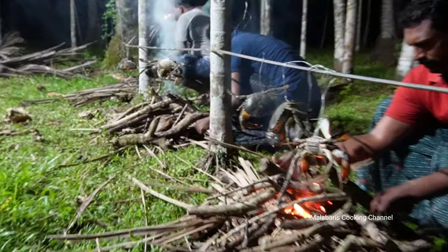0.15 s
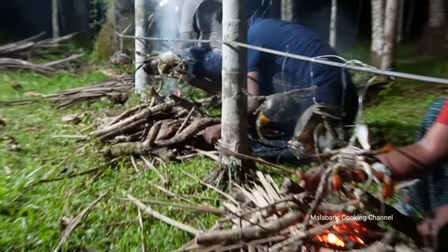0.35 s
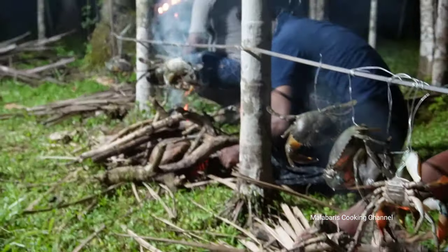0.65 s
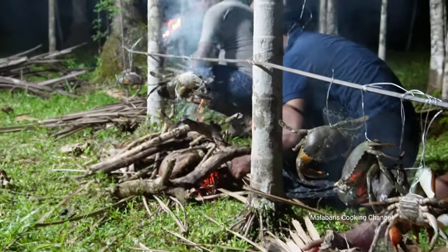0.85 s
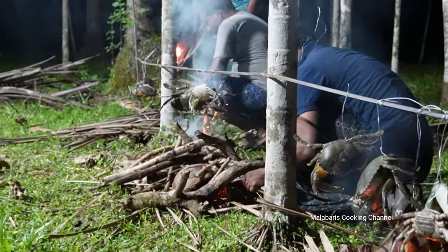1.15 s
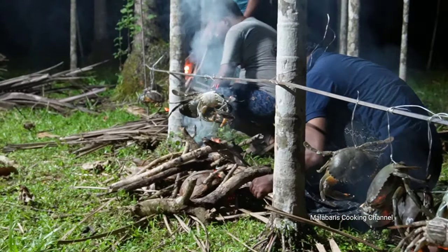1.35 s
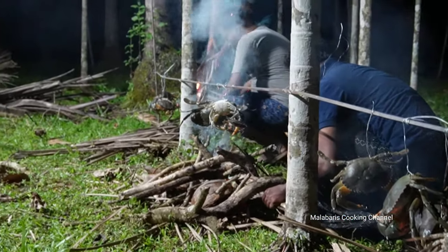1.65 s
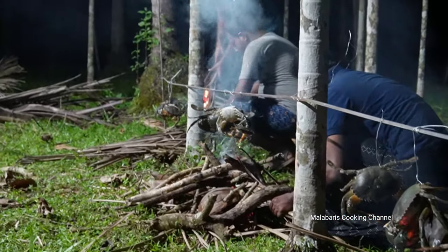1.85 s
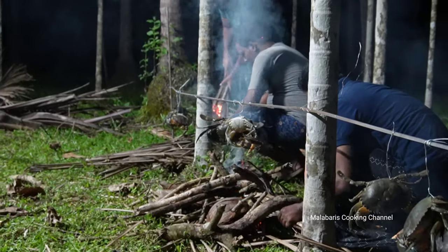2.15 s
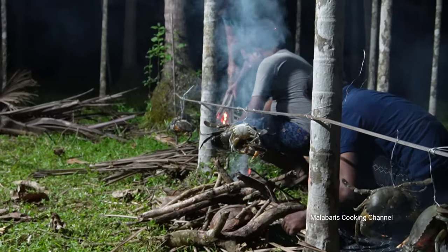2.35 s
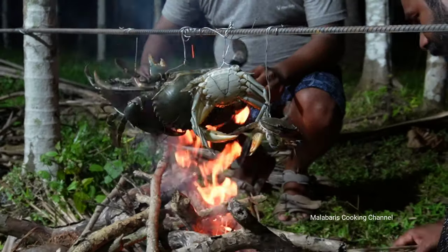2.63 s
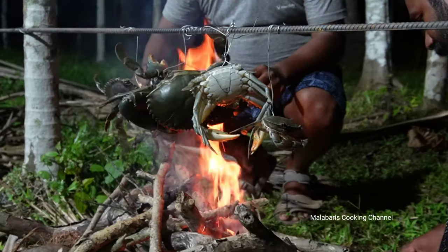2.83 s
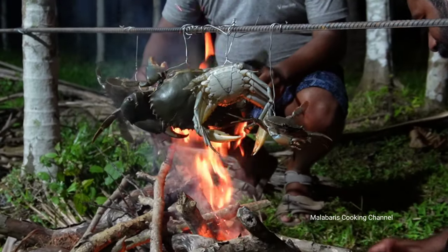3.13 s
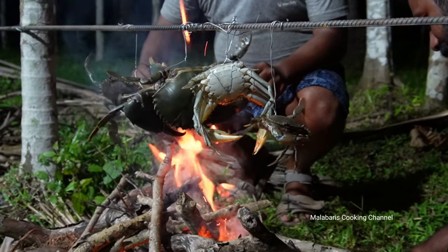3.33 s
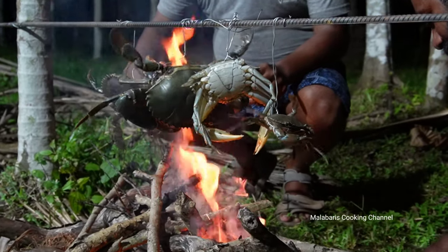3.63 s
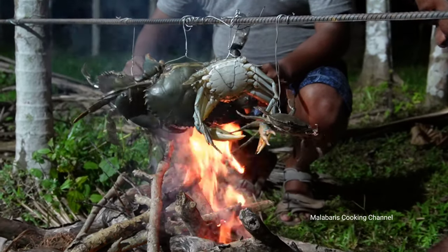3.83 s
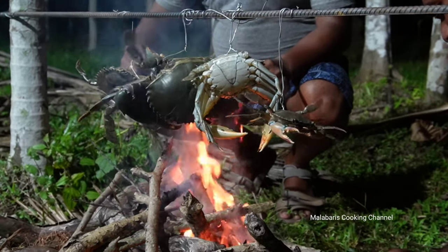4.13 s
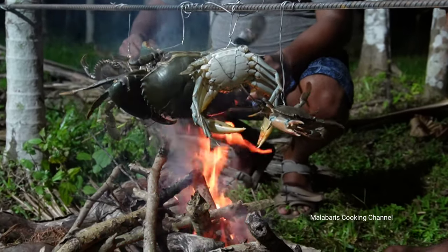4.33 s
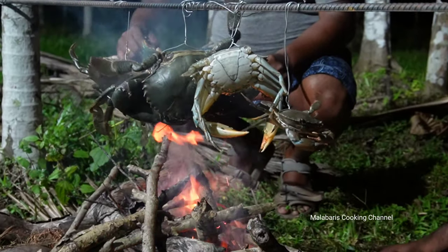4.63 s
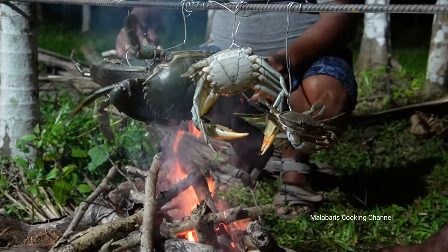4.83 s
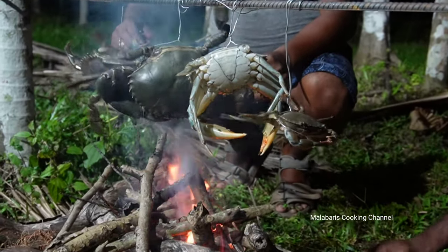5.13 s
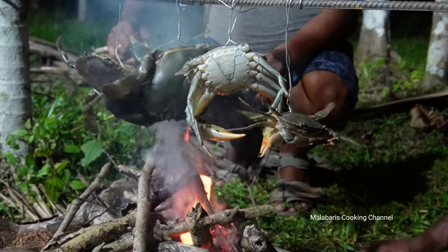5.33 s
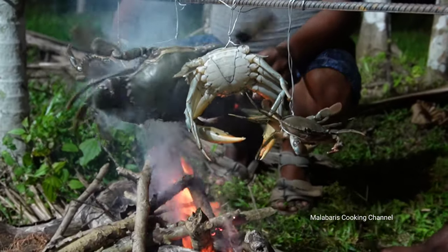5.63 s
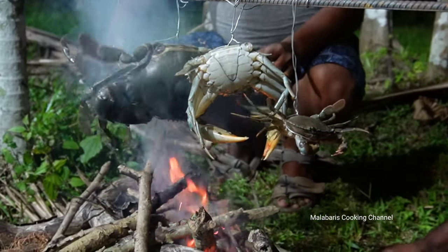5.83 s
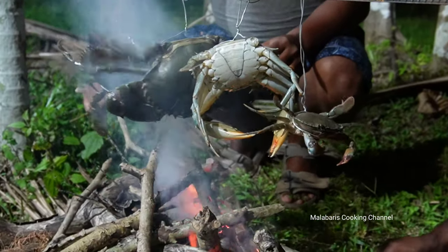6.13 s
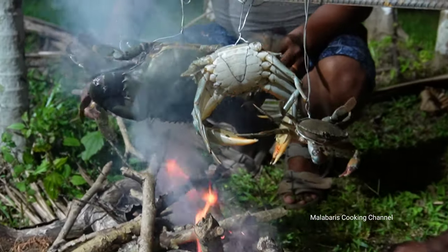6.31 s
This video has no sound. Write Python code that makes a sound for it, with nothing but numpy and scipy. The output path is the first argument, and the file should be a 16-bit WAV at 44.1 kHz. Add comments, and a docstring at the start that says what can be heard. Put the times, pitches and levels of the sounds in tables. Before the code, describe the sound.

Crickets trill in a steady night chorus as dry sticks and palm fronds crackle, snap and crunch in a campfire.

```python
"""A hand-held camera rubs and bumps as it turns, while crickets sing in a grove at night.
Small fires of sticks and palm fronds murmur throughout. Each fracture is an impulse that excites the
wood's resonances: sticks snap and scrape, and dry fronds crackle and crunch as they are fed in.
A near cricket stridulates in long phrases that echo between the trunks, over a steady chorus,
a few low peeps and a thin high buzz."""
import sys
import numpy as np
from scipy import signal
from scipy.io import wavfile

SR = 44100
rng = np.random.default_rng(int(sys.argv[2]) if len(sys.argv) > 2 else 0)


def unload_audio(sound):
    """Save the sound as a 16-bit wav file, at the path given as the first command line argument."""
    columns = np.transpose(np.atleast_2d(sound))
    # keep every value between -1 and 1, then stretch to whole-number steps
    steps = np.round(np.clip(columns, -1, 1) * 32767)
    wavfile.write(sys.argv[1], SR, steps.astype(np.int16))


N = 285327
T = np.arange(N) / SR
MILLISECOND = SR / 1000   # samples
ANTIPHASE = np.array([[1], [-1]])   # left and right gains


def from_db(db):
    """Amplitude ratio: a factor of ten per 20 dB."""
    return 10 ** (np.asarray(db) / 20)


def rms_one(x):
    """Normalisation to unit mean power."""
    return x / np.sqrt(np.mean(x ** 2) + 1e-20)


def in_time(rows):
    """Linear interpolation of a curve at every sample."""
    return np.interp(T, *np.transpose(rows))


def at_hz(points, hz):
    """Interpolation of a spectrum on a logarithmic frequency axis."""
    frequencies, values = np.transpose(points)
    return np.interp(np.log(hz), np.log(frequencies), values)


def band(x, hz, octaves, order=2):
    """A band-pass resonance: the narrower it is, the longer it rings."""
    edges = np.clip([hz * 2 ** (-octaves / 2), hz * 2 ** (octaves / 2)], 10, .48 * SR)
    return signal.sosfilt(signal.butter(order, edges, "band", fs=SR, output="sos"), x + 1e-18)


def white():
    """Gaussian noise has equal mean power per hertz."""
    return rng.standard_normal(N)


def drift(per_s):
    """Random modulation of unit rms, interpolated between so many values a second."""
    knots = rng.standard_normal(2000)
    return rms_one(np.interp(T * per_s, np.arange(len(knots)), knots))


def grains(per_s, size_db):
    """Shot noise: impulses at random moments, most weak, a few strong."""
    sizes = from_db(size_db * np.minimum(rng.exponential(1, N), 5)) * rng.choice([-1, 1], N)
    return sizes * (rng.random(N) < per_s / SR)


def swell_at(s, rise, fall):
    """Exponential growth to 1 at time s, then exponential decay."""
    return np.exp(-np.minimum(np.maximum((s - T) / rise, (T - s) / fall), 20))


def add(out, s, sound):
    """Superposition of a sound from time s onward."""
    i = max(round(s * SR), 0)
    out[..., i:i + sound.shape[-1]] += sound[..., :max(N - i, 0)]


def spread(pair, alike):
    """Sum and difference of two independent signals give left and right the correlation `alike`."""
    alike = np.clip(alike, 0, 1)
    return np.sqrt((1 + alike) / 2) * pair[0] + np.sqrt((1 - alike) / 2) * pair[1] * ANTIPHASE


def pan(db):
    """A level difference places a source; positive is to the left."""
    return from_db([[db / 2], [-db / 2]])


def coloured(draw, spectrum, likeness):
    """Spectral shaping in half-octave bands, each with its own left-right correlation; unit rms."""
    pairs = [[draw(), draw()] for _ in range(2)]
    centres = 20 * 2 ** np.arange(0, 10, .5)
    heard = centres[(centres > spectrum[0][0] / 1.3) & (centres < spectrum[-1][0] * 1.3)]
    out = 0
    for k, hz in enumerate(heard):
        excitation = spread(pairs[k % 2], at_hz(likeness, hz))
        out += from_db(at_hz(spectrum, hz)) * band(excitation, hz, 0.59)
    return rms_one(out)


def grove(x, t60, alike, count=160):
    """Reverberation: convolution with many decaying reflections from trunks and ground."""
    delays, sizes = rng.uniform(.002, .25, (2, count)), rng.standard_normal((2, count))
    echoes = np.zeros((2, SR // 4 + 1))
    for k in range(2):
        echoes[k, (delays[k] * SR).astype(int)] = sizes[k] * from_db(-60 * delays[k] / t60)
    echoes /= np.sqrt(np.sum(echoes ** 2, axis=1, keepdims=True))
    return signal.fftconvolve(np.atleast_2d(x), spread(echoes, alike), axes=1)[:, :N]


def far_insects():
    """Incoherent summation: distant insects blend into a steady hiss."""
    # hiss spectrum: f/Hz, spectrum level/dB
    spectrum = [(4000, -11), (5500, 10), (7500, -10), (9000, -2), (10500, -2), (13000, -11), (15500, -15)]
    return pan(1.8) * from_db(-50.5) * coloured(white, spectrum, likeness=[(6000, .098), (12000, .077)])


def flame_murmur():
    """Unsteady combustion radiates low, gently wavering noise."""
    # flame spectrum: f/Hz, spectrum level/dB
    spectrum = [(20, -34), (35, -13), (60, -2.5), (100, -1), (170, -2), (250, -11.5), (400, -21),
                (800, -21), (1600, -17.5), (3000, -39)]
    waver = from_db(-45 + drift(5.82))
    return waver * coloured(white, spectrum, likeness=[(60, .996), (150, 1.0), (300, 0.76)])


def phrases(last_end_s=6.8):
    """Gating of the near cricket's song: start, end and level of each phrase."""
    # phrases: start t/s, level/dB, pause before the next/s
    song = [(0, -27, 0.081), (.523, -28.5, .105), (1.248, -28.5, .055), (1.891, -26.5, .07),
            (2.501, -27, .065), (3.24, -27, 0.05), (3.85, -26.5, .1), (4.523, -27.5, .095),
            (5.126, -27.5, .09), (5.674, -28, .08), (6.23, -30.5, .08)]
    next_starts = [row[0] for row in song[1:]] + [last_end_s]
    return [(start, following - pause, db) for (start, db, pause), following in zip(song, next_starts)]


def chorus(voices, waver_db):
    """Many crickets of unrelated phase sum to wavering narrow-band noise."""
    out = 0
    for hz, width_hz, db in voices:
        song = band(rng.standard_normal((2, N)), hz, np.log2(1 + width_hz / hz), order=3)
        out += from_db(db + waver_db * drift(12)) * spread(rms_one(song), alike=0.59)
    return out


def choirs(join_s=0.065, fade_s=0.13):
    """Synchrony: neighbours join and fade with the near cricket's phrases; far choirs never pause."""
    # song bands of both groups: f/Hz, bandwidth/Hz, level/dB
    distant = [(2316, 180, -62.5), (3180, 350, -48.5), (6570, 690, -35), (7100, 730, -43.5),
               (8880, 1760, -46)]
    neighbours = [(6263, 590, -36.5), (6710, 54, -37.5)]
    in_step = sum(np.clip(np.minimum((T - start) / join_s, (end - T) / fade_s + 0.18), 0, 1)
                  for start, end, _ in phrases())
    steady = pan(-0.4) * chorus(distant, waver_db=1.54)
    return steady + pan(-0.5) * in_step * chorus(neighbours, waver_db=1.3)


def high_buzz(first_s=.15, every_s=.633, half_length_s=0.11):
    """Sidebands: a bush cricket's fast tooth rate splits its note into lines, blurred by the trees."""
    # spectral lines: f/Hz, level/dB
    sidebands = [(9530, -52), (9880, -41.5), (10240, -49), (10570, -48), (10920, -52), (11270, -60)]
    calls_s = np.arange(first_s, T[-1] + half_length_s, every_s)
    swell = sum(np.exp(-((T - s) / half_length_s) ** 2) for s in calls_s)
    lines = sum(from_db(db) * spread(rms_one(band(rng.standard_normal((2, N)), hz, 0.0066)), alike=0.38)
                for hz, db in sidebands)
    return from_db(-7.5) * swell * lines


def peeps(top_hz=3500, bottom_hz=2980, length_s=0.0427):
    """Linear frequency sweeps: a lower caller slides down in soft peeps that reverberate."""
    # peeps: t/s, level/dB
    calls = [(0.102, -32), (0.345, -34), (1.013, -29), (1.256, -31.5), (5.018, -34), (5.073, -26.5),
             (5.314, -33), (5.367, -26.5), (5.629, -32.5), (5.68, -24)]
    out, progress = np.zeros(N), np.arange(int(length_s * SR)) / (length_s * SR)
    hz = top_hz + (bottom_hz - top_hz) * progress
    peep = np.sin(np.pi * progress) ** 1.3 * np.sin(2 * np.pi * np.cumsum(hz) / SR)
    for s, db in calls:
        add(out, s, from_db(db) * peep)
    return from_db(-2) * out + from_db(-6.5) * grove(out, t60=.6, alike=.5)


def handling(ring_cycles=1.9, body_hz=420, click_db=-11, click_s=0.011, size=4096):
    """Structure-borne sound: bumps ring briefly in the camera's body; the grip rubs and rocks it."""
    # soft impacts: t/s, level/dB, f/Hz
    impacts = [(0.023, -26.5, 358), (.178, -21.5, 218), (0.348, -33, 400), (0.373, -40, 300),
               (.443, -31, 416), (0.495, -28, 407), (0.551, -20, 495), (0.597, -33, 223), (0.62, -17, 454)]
    # friction of the grip: t/s, level/dB
    friction = [(0, -38.5), (.15, -54), (.2, -42.5), (.35, -37.5), (.52, -41.5), (.63, -31), (.7, -77),
                (1.0, -72)]
    # its spectrum: f/Hz, spectrum level/dB
    spectrum = [(80, -37), (130, 3), (205, -5.5), (290, -3.5), (410, -4), (550, -5.5), (1200, -19),
                (2500, -12.5)]
    bumps, t = np.zeros((2, N)), np.arange(size) / SR
    for s, db, hz in impacts:
        thud = np.sin(2 * np.pi * hz * t) * np.exp(-t * hz / ring_cycles)
        noise = rms_one(band(rng.standard_normal((2, size)), hz=920, octaves=3.7))
        click = spread(noise, alike=0.62) * np.exp(-t / click_s)
        add(bumps, s, from_db(db) * (thud + from_db(click_db) * click))
    rub = coloured(lambda: grains(per_s=260, size_db=2.8), spectrum, likeness=[(200, 1.0), (1200, 0.67)])
    rocking = from_db(-12) * rms_one(band(white(), body_hz, 0.071)) * ANTIPHASE
    return bumps + from_db(in_time(friction)) * (rub + rocking)


def near_cricket(top_hz=6930, bottom_hz=5700, stroke_s=0.01202, strokes_per_s=35.1, fade_out_s=0.066):
    """Stridulation: each stroke is a whistle that falls as the wing slows; the trunks reflect it."""
    echo_count, echo_gap_s, echo_t60 = 14, .005, 0.36
    out, progress = np.zeros((2, N)), np.arange(int(stroke_s * SR)) / (stroke_s * SR)
    sweep_hz = top_hz + (bottom_hz - top_hz) * progress ** 1.25
    envelope = signal.windows.tukey(len(progress), .5)
    for start, end, db in phrases():
        strokes = np.arange(start, end, 1 / strokes_per_s)
        for s, (detune, late) in zip(strokes, rng.standard_normal((40, 2))):
            hz = sweep_hz * (1 + .004 * detune)
            whistle = envelope * np.exp(2j * np.pi * np.cumsum(hz) / SR)
            whistle *= from_db(db) * min(1, (end - s) / fade_out_s)
            add(out, s + .0002 * late, from_db(-2.0) * whistle.real)
            delays = (np.arange(echo_count) + rng.random(echo_count)) * echo_gap_s
            for delay, bearing in zip(delays, rng.standard_normal(echo_count)):
                # an oblique echo reaches one side a part of a cycle earlier
                echo = (whistle * np.exp(.7j * bearing * ANTIPHASE)).real
                add(out, s + delay, from_db(-3.0 - 60 * delay / echo_t60) * echo)
    return pan(-4.0) * out


def crackle():
    """Shot noise of burning fronds: denser as the blaze grows louder, with bright pips standing out."""
    # strength of the blaze: t/s, level/dB
    blaze = [(0.0, -38.5), (0.63, -39.5), (0.76, -35), (1.08, -39.5), (1.44, -36.5), (1.58, -39),
             (1.77, -32.5), (1.91, -32), (2.09, -36.5), (2.29, -37.5), (2.47, -34), (2.58, -34),
             (2.7, -36.5), (3.03, -44.5), (3.98, -44), (4.42, -38.5), (4.81, -44), (5.35, -42.5),
             (5.55, -40), (5.98, -39.5), (6.2, -43), (6.47, -43)]
    # crackle spectrum: f/Hz, spectrum level/dB
    spectrum = [(300, -5), (600, -3), (1200, -2), (2200, 2), (4000, 5.5), (5500, 3.5), (8000, -4),
                (11000, -10.5), (15000, -41)]
    # likeness of left and right: f/Hz, correlation
    likeness = [(500, 0.81), (2000, 1), (5000, 0.87), (8000, 0), (13000, 0.6)]
    blaze_db = in_time(blaze)
    per_s = 2200 * from_db(blaze_db - blaze_db.mean())
    fine = coloured(lambda: grains(per_s, size_db=3.0) / np.sqrt(per_s), spectrum, likeness)
    clumps = from_db(.9 * drift(30) + 1.9 * drift(220))
    pips = sum(from_db(db) * rms_one(band(grains(per_s=30, size_db=3.5), hz, 0.37, order=1))
               for hz, db in [(2300, -12), (4200, -12.5), (9000, -17)])
    return from_db(blaze_db) * (clumps * fine + pips)


def stirred_sticks():
    """Light random impacts excite the sticks' resonances as the fire is stirred."""
    # strength of the knocking: t/s, level/dB
    stirring = [(0, -93), (4.3, -62.5), (4.8, -58.5), (5.0, -49.5), (5.25, -55.5), (5.45, -48.5),
                (5.7, -54.5), (6.1, -57.5), (6.47, -71)]
    ticks = sum(rms_one(band(grains(per_s=10, size_db=4.0), hz, 0.47)) for hz in [784, 1140, 1530, 2060])
    return from_db(in_time(stirring)) * ticks


def scrapes(rasp_octaves=1.6, rasp_db=-5.5, rise_share=0.23):
    """Stick-slip friction: bark catches and slips in tiny jerks, which set the sliding stick ringing."""
    # stick sliding on stick: peak t/s, level/dB, ring f/Hz, bandwidth/octaves, decay time/s
    slides = [(2.255, -39.5, 1213, 0.33, .03), (2.26, -27, 4300, .45, 0.031),
              (3.29, -43.5, 1820, 0.5, 0.059), (3.406, -30, 1950, 0.41, 0.035),
              (3.44, -46.5, 850, .3, 0.047), (4.707, -39, 1310, .8, 0.013), (4.958, -40, 1430, 1.3, 0.032),
              (5.3918, -22.5, 1030, .5, 0.0026), (5.421, -36, 1310, 0.79, .04), (6.121, -39, 686, .2, 0.02)]
    out, slips = 0, grains(per_s=5000, size_db=2.0) * from_db(2.5 * drift(300))
    for s, db, hz, octaves, fall in slides:
        ring = rms_one(band(slips, hz, octaves))
        rasp = from_db(rasp_db) * rms_one(band(slips, hz, rasp_octaves))
        out += from_db(db) * swell_at(s, rise_share * fall, fall) * (ring + rasp)
    return out


def crunches(leaf_octaves=2.35, stick_hz=850, stick_db=-16):
    """Fracture cascades swell and die away as dry leaves give, and shake the sticks too."""
    # crushed fronds: peak t/s, level/dB, centre f/Hz, rise and decay time/s
    crushes = [(.24, -33.5, 3100, 0.051), (.652, -25.5, 3200, 0.02), (1.323, -24.5, 2370, 0.013),
               (1.4, -25, 2780, 0.01), (1.551, -17.5, 2580, 0.026), (1.81, -27.5, 3170, 0.066),
               (1.891, -20, 2800, 0.0067), (2.926, -27.5, 2880, 0.024), (4.28, -31.5, 3660, 0.044),
               (4.635, -22, 2920, 0.017), (5.04, -31.5, 2300, 0.026), (5.503, -19.5, 2270, 0.0096),
               (6.11, -38, 1620, 0.079)]
    fractures = grains(per_s=5300, size_db=2.0) * from_db(4.3 * drift(300))
    sticks = from_db(stick_db) * rms_one(band(fractures, stick_hz, 1.0))
    out = 0
    for s, db, hz, length in crushes:
        leaves = rms_one(band(fractures, hz, leaf_octaves))
        out += from_db(db) * swell_at(s, length, length) * (leaves + sticks)
    return out


def fibre_ticks(tick_hz=9000, tick_octaves=0.54, tear=.3, decay_s=.0008, size=1024):
    """Brittle fracture: a leaf fibre is too light to knock or ring, so only its crack is heard."""
    # parting fibres: t/s, level/dB (energy as rms over 1 ms)
    breaks = [(1.6766, -27), (3.1712, -30), (3.452, -23), (4.0265, -28.5), (4.3355, -29), (4.616, -26),
              (4.9954, -27.5)]
    out, t = np.zeros((2, N)), np.arange(size) / SR
    for s, db in breaks:
        burst = tear * spread(rng.standard_normal((2, size)), alike=0.37) * np.exp(-t / decay_s)
        burst[:, 0] += 1
        tick = rms_one(band(burst, tick_hz, tick_octaves, order=1))
        add(out, s, from_db(db) * tick * np.sqrt(MILLISECOND / size))
    return out


def snaps(tear=0.34, ring_octaves=0.78, knock_hz=1050, crack_hz=9200, scatter=0.46, size=2048):
    """Impulse response: a stick breaks in the heat and tears on briefly; it knocks, rings and cracks."""
    # snapping sticks: t/s, ring level/dB, ring f/Hz, tearing time/s, crack level/dB
    breaks = [(.672, -14, 4100, .002, -31), (1.188, -23, 3200, .0008, -32), (1.2298, -16, 4670, .003, -28),
              (1.3123, -23, 3080, 0.0018, -21), (1.3303, -17, 2790, 0.0012, -36),
              (1.3911, -15.5, 3180, 0.0031, -31), (1.5422, -10.5, 3200, 0.0034, -24),
              (1.554, -4, 3130, .005, -17), (1.7808, -16, 3920, 0.001, -22.5),
              (1.8232, -12, 3250, 0.0011, -24), (1.84, -11, 4300, 0.0016, -15.5),
              (1.8864, -9.5, 4060, 0.0028, -22), (1.991, -8, 5100, 0.00022, -16),
              (2.0163, -11.5, 3380, 0.00084, -9), (2.3535, -26, 4000, 0.0032, -21.5),
              (2.446, -20.5, 3600, .004, -22.5), (2.7434, -22, 4730, 0.00099, -20),
              (2.902, -19, 3100, .0016, -37), (3.1458, -26, 1830, .002, -46),
              (3.488, -23.5, 3320, 0.0022, -21), (3.5994, -20.5, 2900, 0.0017, -18),
              (3.7167, -18.5, 3580, 0.0012, -23.5), (4.2367, -14.5, 2710, 0.00084, -29),
              (4.2815, -20.5, 3900, 0.00055, -26), (4.291, -13.5, 4060, .0008, -30),
              (4.3267, -19, 4900, 0.0028, -34), (4.463, -19.5, 3970, .0007, -33),
              (4.4869, -14, 3170, 0.0034, -24), (4.6368, -5, 3498, 0.0018, -16),
              (4.9228, -22.5, 1480, .002, -46), (5.0619, -19.5, 3200, 0.0014, -25),
              (5.1211, -21, 1870, 0.0015, -40), (5.3908, -6, 3270, .0012, -23),
              (5.4749, -12, 2630, 0.0023, -15), (5.5666, -22.5, 3450, .0014, -29),
              (5.6476, -17, 4200, .0008, -33), (5.7643, -20, 4040, 0.0009, -14),
              (5.8307, -18, 5300, .0007, -24.5), (6.1412, -19.5, 2120, .001, -27),
              (6.44, -19, 3760, 0.00064, -44)]
    usual_tear_s = 0.0021
    out, t = np.zeros((2, N)), np.arange(size) / SR
    for s, ring_db, ring_hz, tear_s, crack_db in breaks:
        # a stick that tears for longer is thicker and knocks more
        knock_db = ring_db - 14 + 3 * np.log2(tear_s / usual_tear_s)
        burst, aside = tear * rng.standard_normal((2, size)) * np.exp(-t / tear_s)
        burst[0] += 1   # the click of the break
        # short waves scatter off the pile and reach the two sides differently
        crack = pan(1.0) * band(burst + scatter * aside * ANTIPHASE, crack_hz, octaves=0.26, order=1)
        knock = band(burst, knock_hz, octaves=0.98)
        ring = band(burst, ring_hz, ring_octaves)
        parts = [(knock, knock_db), (ring, ring_db), (crack, crack_db)]
        snap = sum(from_db(db) * rms_one(part) for part, db in parts)
        add(out, s, snap * np.sqrt(MILLISECOND / size))
    return from_db(-1.63) * out


def scene():
    """Superposition of fire, handling and insects; the wood's sounds have a short reverberation."""
    wood = snaps() + fibre_ticks() + crunches() + scrapes()
    direct = pan(-0.77) * (wood + crackle() + stirred_sticks())
    fire = direct + from_db(-8.5) * grove(wood, t60=0.041, alike=0.85) + flame_murmur()
    return fire + far_insects() + handling() + near_cricket() + choirs() + peeps() + high_buzz()


def record(dry):
    """Peaks clip at full scale, and a steep low-pass removes the highest treble."""
    low_pass = signal.ellip(10, .1, 80, 15700, fs=SR, output="sos")
    return signal.sosfilt(low_pass, np.clip(dry, -1, 1))


dry = scene()
out = record(dry)
unload_audio(out)
```